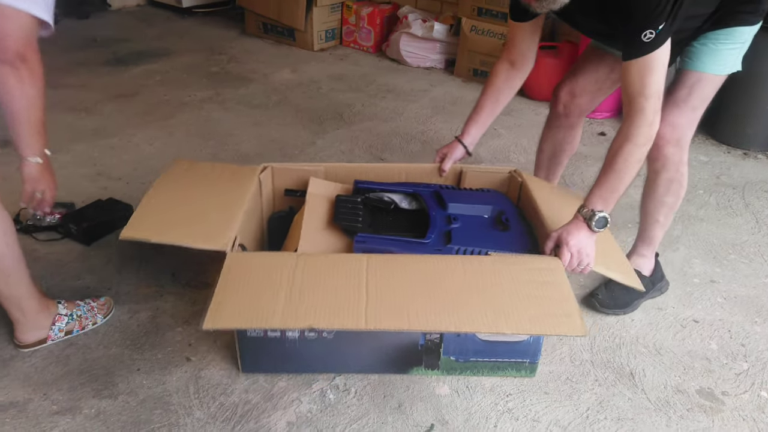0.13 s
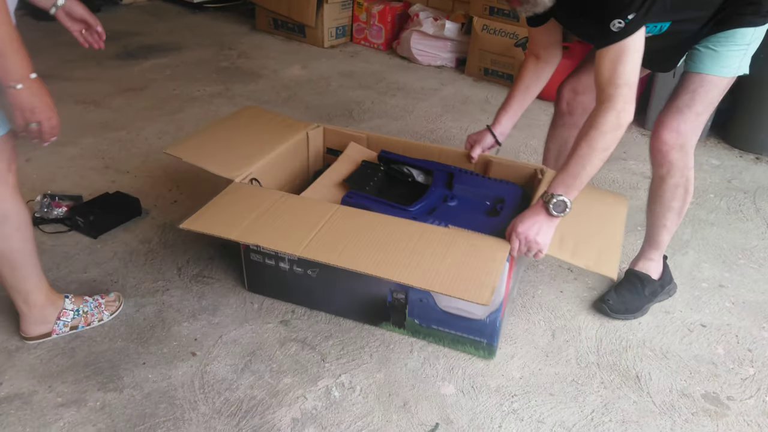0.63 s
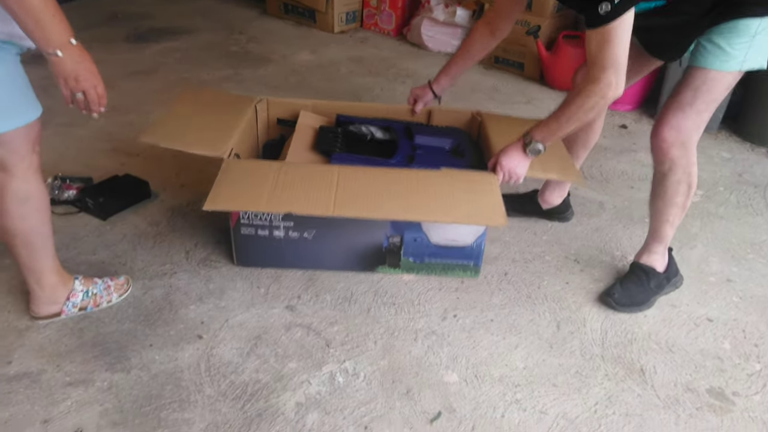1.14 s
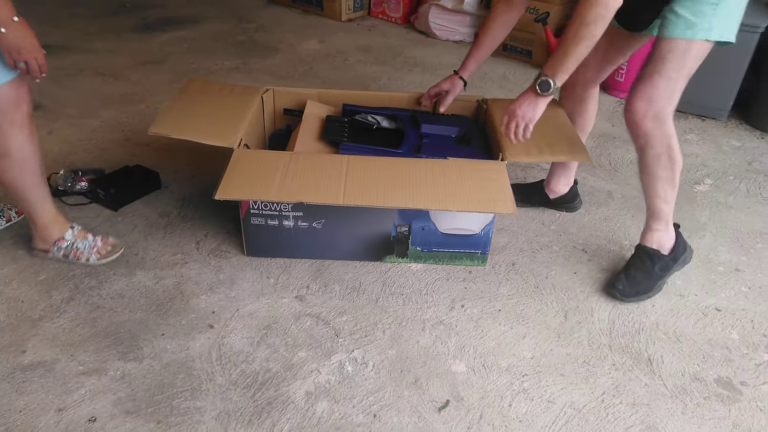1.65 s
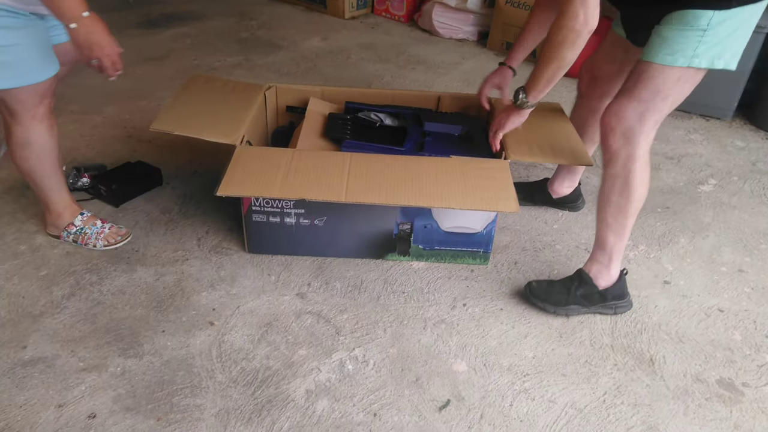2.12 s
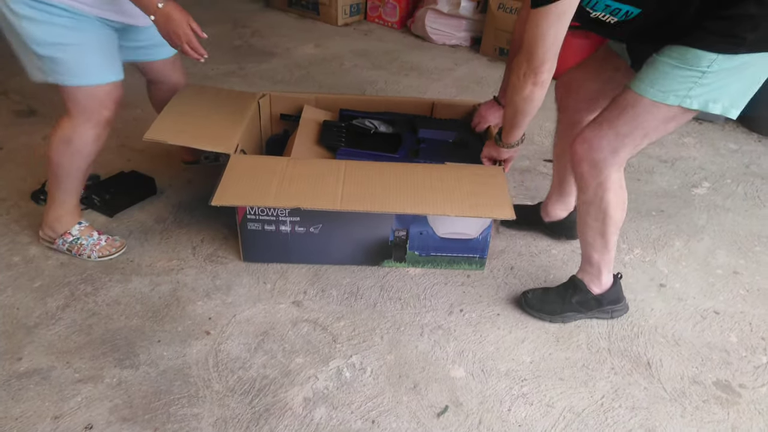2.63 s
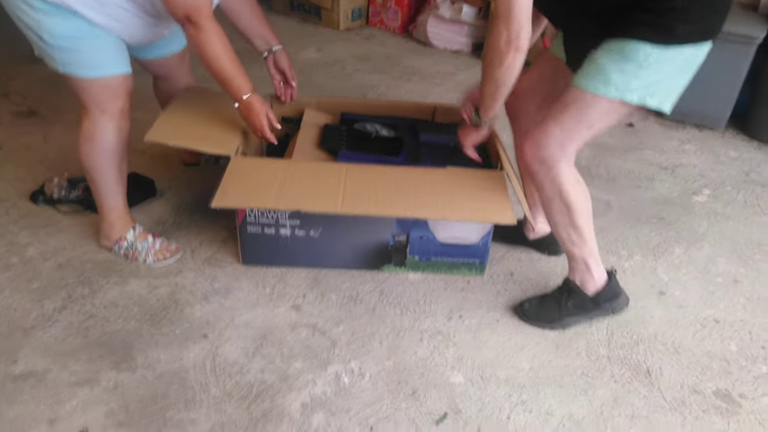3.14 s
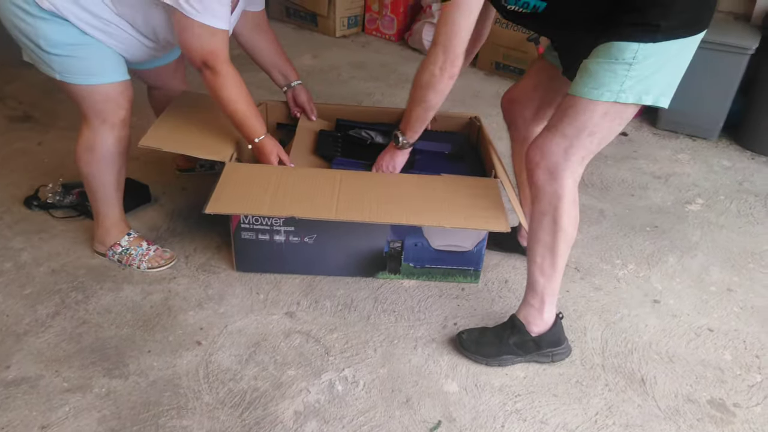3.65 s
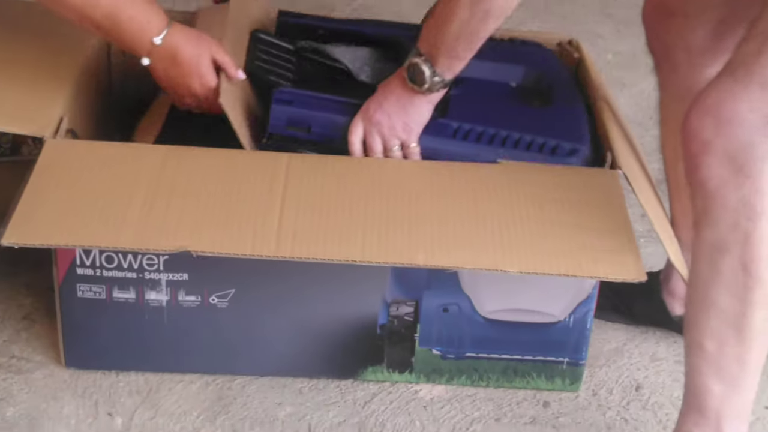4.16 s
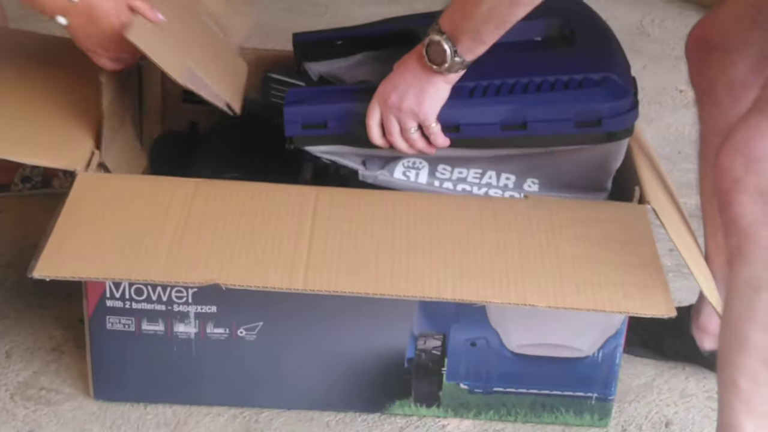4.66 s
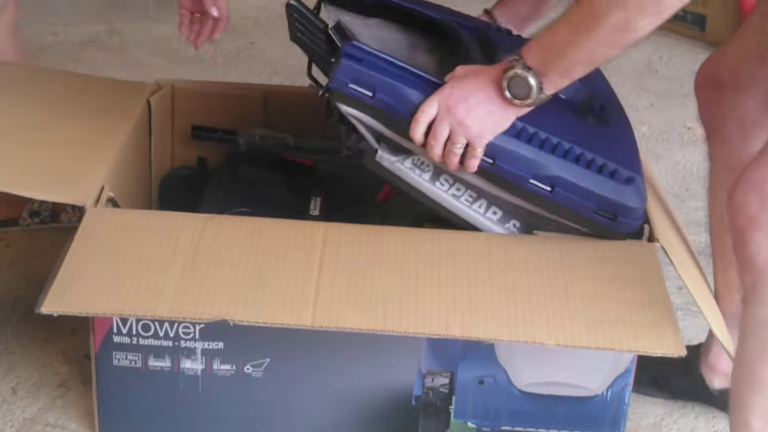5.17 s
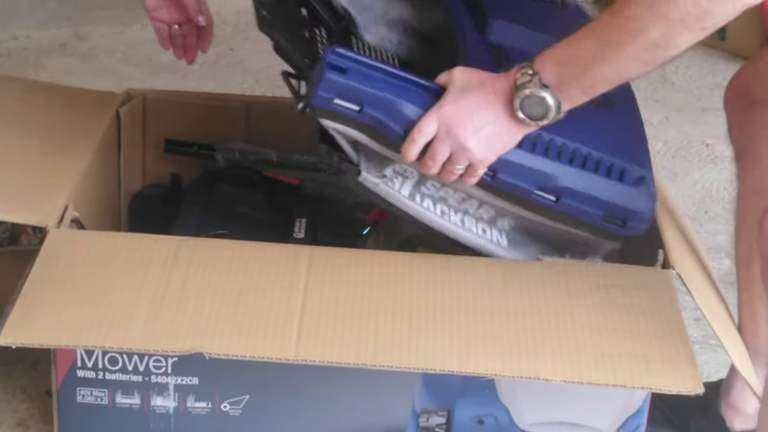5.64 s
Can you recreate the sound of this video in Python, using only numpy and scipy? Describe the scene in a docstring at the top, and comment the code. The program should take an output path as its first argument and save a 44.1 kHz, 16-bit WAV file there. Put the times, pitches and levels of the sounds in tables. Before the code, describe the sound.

A heavy cardboard box is dragged gratingly over concrete in a garage, then plastic parts rustle and knock as they are pulled out.

```python
"""Cardboard box in a garage

A full box is dragged over concrete, then inserts and a plastic part are pulled out of it.
Shaped noise makes the rubbing, struck modes the knocks, noise bursts the snaps and swishes.
Gliding tones make the sparrows, noise strokes a far bird, steady sines a faint motor whine.
Two unlike microphones hear it; a finger covers the left one at first."""
import sys
import numpy as np
from scipy import signal
from scipy.fft import rfft, irfft, next_fast_len
from scipy.io import wavfile
from scipy.ndimage import uniform_filter1d

SR = 44100
rng = np.random.default_rng(int(sys.argv[2]) if len(sys.argv) > 2 else 0)


def gain_from_db(level_db):
    """Convert decibel levels to linear amplitude factors (20 dB per decade)."""
    decades = np.asarray(level_db, float) / 20
    return 10 ** decades


def int16_out(signal):
    """Quantize to a 16-bit WAV file."""
    q = np.round(np.clip(np.atleast_2d(signal).T, -1, 1) * 32767)
    wavfile.write(sys.argv[1], SR, q.astype(np.int16))


N = 255159  # length [samples]

# still air of the garage and the street: (frequency [Hz], level per hertz [dB])
AIR_SPECTRUM = [(25, -115), (38, -88), (52, -70), (65, -77.5), (85, -90), (125, -85), (220, -93.5),
                (800, -100), (3000, -108.5), (7000, -101.5), (12000, -110), (17000, -112)]
# motor whine: (frequency [Hz], level before the lift in air() [dB])
WHINE_TONES = [(732.1, -72), (1464, -71.5), (2196, -75)]
# modes of the box, struck or rubbed: (frequency [Hz], level [dB], free t60 [s])
BOX_MODES = [(63, 1, 0.17), (85.7, 5, 0.2), (134, -1, 0.22), (152.3, 6.5, 0.14), (188, 2, 0.096),
             (250, 3, 0.08), (289.1, 2, 0.082), (347.3, -4, 0.1), (449.3, 2.5, 0.071), (528, 2.5, 0.053),
             (672, -6, 0.14), (965, -12.5, 0.2), (1145, -3.5, 0.028)]
# steady rubbing, first the drag over the floor, then hands shuffling in the box:
# (time [s], force [dB], weight on the walls [dB], brightness [dB])
SHUFFLE_CURVE = [(0, -57.5, -2, -5.5), (.13, -44.5, 3.5, -1.5), (.28, -35, -4, -11), (.33, -32, -1, -3),
                 (.56, -33, 3, -6.5), (.6, -41, 0, -5.5), (.78, -42.5, 12.5, -11), (.98, -29, 9, -5.5),
                 (1.08, -42, 8, -1.5), (1.24, -43.5, 5, -7.5), (1.34, -61.5, 5.5, -4),
                 (2.2, -57.5, -4.5, -9.5), (2.7, -55, -4.5, -11), (2.84, -68.5, 18, 9), (3.1, -56.5, 1, -6),
                 (3.3, -57, -14, -23), (3.55, -53, -4.5, -7.5), (4.3, -51, 2.5, -11.5),
                 (4.64, -54.5, -3, -22), (5.4, -62.5, -6, -19), (5.79, -51, -0.5, -9)]
# slides that swell and fade:
# (time of the peak [s], fade by 20 dB [s], force [dB], weight on the walls [dB], brightness [dB])
SLIDE_EVENTS = [(0.418, 0.0258, -26.5, 0.5, -30), (.53, 0.01, -33, 1, -5), (0.729, 0.036, -44, 19, -18),
                (.76, .03, -35.5, 5, -1.5), (0.903, 0.0314, -22.5, -4, -15), (.98, .07, -25, 8, -6),
                (1.5, 0.27, -61.5, 0.5, -4), (1.6, 0.34, -68, 6, -6), (2.1, 0.14, -57, -9, -6),
                (2.46, 0.07, -52.5, 3, -10), (2.609, 0.06, -53.5, 1.5, -4), (3.29, 0.08, -53.5, -10, -9.5),
                (3.431, 0.0464, -39, -11, -2), (3.62, 0.07, -51, 0.5, -2.5), (4.08, 0.09, -47, -1.5, -7.5),
                (4.19, .09, -42.5, -3.5, -1.5), (4.46, 0.13, -49.5, -0.5, -7),
                (4.533, 0.06, -40, -9.5, -16), (4.8, .08, -47.5, 1, -7), (4.86, 0.06, -38.5, 1.5, -3),
                (4.918, 0.078, -37, 6, -18), (5.33, 0, -56.5, -5, -6.5), (5.501, 0.2, -53.5, -3.5, -14),
                (5.742, 0.06, -27, -2, -16)]
# jerks that start abruptly and die away:
# (time [s], fade by 20 dB [s], force [dB], weight on the walls [dB], brightness [dB])
JERK_EVENTS = [(0.629, 0.29, -37.5, 5, -3.5), (0.814, 0.0881, -19, -13, -8.5), (0.886, 0.02, -20.5, 1, -5),
               (1.358, 2, -70, 3, -9), (1.446, 0.14, -42.5, -20, -18), (3.386, 0.33, -43.5, -9, -8),
               (3.814, 0.08, -35, -7, -9), (4.697, 0.16, -45.5, 0.5, -14), (5.052, 0.1034, -28, 2.5, -27),
               (5.696, 0.2, -33.5, 10.5, -4)]
# plastic fizzes more than card: (time [s], fizz [dB])
FIZZ_CURVE = [(0, 4), (1.2, 10.5), (1.4, 12), (3.3, 9.5), (3.7, 14.5), (5.79, 19.5)]
# snaps and slips of card and plastic: (time [s], level [dB], tone [Hz], ring over burst [dB])
SNAP_EVENTS = [(.0787, -22.5, 2120, -9), (.2154, -22.5, 2640, 10.5), (.3037, -21, 1540, -20),
               (.3444, -20, 1030, 9.5), (.4144, -30, 1570, 2), (.4609, -26, 2370, 17),
               (.4743, -15.5, 2680, 13.5), (.5312, -19.5, 2220, 11), (.6275, -16.5, 2400, 12.5),
               (.6474, -26.5, 1540, 13), (.6853, -14.5, 1930, 7.5), (.7512, -25, 1340, 6),
               (.8106, -10.5, 1410, -15), (.8869, -8, 1170, -9), (.9263, -12.5, 1190, 14),
               (.9652, -8, 1320, 5), (.9904, -8, 1020, -3), (1.0216, -9.5, 1310, 3),
               (1.3568, -31.5, 2900, -18), (1.4456, -28.5, 1460, -18), (3.2655, -42, 1270, 8),
               (3.3827, -45, 956, -1), (3.3997, -38, 3800, 26), (3.4116, -32.5, 2130, 14),
               (3.4305, -31.5, 2630, 22.5), (3.4436, -22.5, 969, -31), (3.4564, -28.5, 2360, 19),
               (3.4615, -40, 2480, 19), (3.6162, -41, 996, 3), (3.8142, -22, 1610, -4),
               (4.5286, -23, 840, 3), (4.6967, -31, 900, 9), (4.781, -33.5, 2300, 23),
               (5.0564, -18.5, 1010, 5), (5.0978, -28.5, 1100, 14), (5.2111, -36, 2900, 9),
               (5.4276, -45, 2600, 22), (5.668, -35, 1360, -6), (5.693, -13, 2700, -5)]
# knocks and steps:
# (time [s], peak [dB], tone that the struck spot favours [Hz], ring an octave above it [dB])
KNOCK_EVENTS = [(.17, -63, 250, -6), (.337, -54, 127, -4), (.626, -32, 270, -4), (.813, -24.5, 342, -25),
                (.89, -19, 225, -3), (1.348, -43, 146, 2), (1.446, -37.5, 288, -7),
                (1.631, -39.5, 264, -19), (2.222, -52, 128, -11), (2.341, -40.5, 280, -12.5),
                (2.442, -38, 188, -9), (2.587, -41, 134, -2), (2.601, -38.5, 148, 8), (2.758, -53, 127, -2),
                (2.834, -29, 164, -4.5), (2.995, -44, 175, -10), (3.048, -32.5, 144, -2),
                (3.4, -46, 230, -14), (3.527, -43, 127, -5), (3.611, -42.5, 148, -12),
                (3.815, -36.5, 152, -13), (4.017, -42, 195, -14), (4.168, -37.5, 181, 5),
                (4.523, -47, 264, -4), (4.701, -38.5, 347, -6), (4.715, -44, 150, -12),
                (4.909, -32, 444, 8), (5.048, -21.5, 160, 1), (5.098, -28.5, 201, -9.5),
                (5.126, -41, 109, -6), (5.485, -38, 80.5, -4), (5.7, -24.5, 380, -6),
                (5.733, -18, 326, -10)]
# card squeaks on concrete or plastic: (time [s], level [dB], tone [Hz], length [s])
SQUEAK_EVENTS = [(0.3, -28, 3540, .03), (.316, -25.5, 4020, 0.024), (0.741, -30, 4030, 0.018),
                 (3.267, -54, 2760, 0.03), (3.379, -45, 980, 0.028), (3.505, -56, 2450, .02)]
# one sparrow chirp, a faint lead-in first: (time [s], pitch [Hz], level within the chirp [dB])
CHIRP_GLIDE = [(0, 5553, -33), (.008, 5970, -7), (.013, 5860, -21), (.013, 3883, -5.5), (.019, 4160, 2),
               (.033, 5550, 0.5), (.045, 5932, -2.5), (.054, 4307, 4.5), (.061, 3617, 7.5),
               (0.069, 4059, -5.5), (.079, 3322, 4.5), (.092, 3468, 2.5), (.103, 4100, 3.5),
               (.108, 4500, -6)]
# sparrow chirps: (time [s], level before the mix [dB])
SPARROW_CALLS = [(0.47, -33), (1.9, -36), (2.758, -35), (4.077, -38.5), (5.458, -39)]
# swishes of plastic and cloth, all treble; a fade under 0.005 s counts as 0.005 s:
# (time of the peak [s], fade by 20 dB [s], level [dB], top octave over level [dB])
SWISH_EVENTS = [(1.37, 0.13, -42, -8), (1.56, 0.1, -40, -8), (1.81, -0.37, -35, -10),
                (2.12, -0.04, -42.5, -13), (2.232, 0.03, -40, -6), (2.53, 0.5, -46, -1),
                (2.72, -0.1, -47, 1), (2.81, 0.25, -48, 0), (2.97, 0.07, -38.5, -3), (3.77, 0.2, -46, 2),
                (3.85, 0.33, -40, 0), (4.19, 0.1254, -24, 1.5), (4.03, -0.26, -46, 4), (4.54, .03, -38, 6),
                (4.76, 0.02, -39, 5), (4.9, 0.16, -28, 6), (5.23, .03, -31, 6), (5.265, 0.04, -32, 6),
                (5.675, -0.3, -41.5, 6)]
# a far bird's short trills: (time [s], level [dB], middle pitch [Hz])
FAR_TRILLS = [(1.6297, -55, 5100), (2.1844, -50, 5000), (2.3896, -47, 5100), (2.4468, -51, 5300),
              (3.0926, -49, 5020), (4.371, -50, 5300), (4.674, -53.5, 5380), (5.29, -44.5, 4400)]
# reverberation of the garage: (frequency [Hz], t60 [s])
GARAGE_DECAY = [(100, 0.42), (500, 0.4), (2000, 0.43), (6000, 0.28), (14000, 0.43)]
# likeness of the two sides: (frequency [Hz], share of power in common [0-1])
LIKENESS = [(60, 1), (130, 0.98), (290, 0.94), (640, 0.51), (1410, 0.047), (3100, 0.0072), (6820, 0.016),
            (15000, 0.02)]
# left microphone colour: (frequency [Hz], gain [dB])
LEFT_COLOUR = [(20, -4), (45, 2.5), (3000, 0), (4100, -3), (4600, -0.5), (5500, 2.5), (7100, 6), (7600, 1),
               (8100, -9.5), (8700, -2.5), (11000, -12), (11600, -14.5), (12500, -13), (14500, -10),
               (15900, -11), (16400, -42)]
# right microphone colour: (frequency [Hz], gain [dB])
RIGHT_COLOUR = [(20, -15), (45, 0), (3000, -3), (4000, 3), (5300, 12.5), (6500, 4), (7400, -12),
                (7950, -30), (8400, -21.5), (9000, -25.5), (9500, -32), (10300, -27), (13000, -30),
                (13600, -26), (14300, -18.5), (15900, -16), (16400, -33)]
# finger sliding off the left port: (time [s], upper edge of what passes [Hz])
FINGER_EDGE = [(0, 196), (.2, 250), (.27, 686), (0.302, 1870), (.35, 5350), (.4, 15300), (.46, 40000)]
# the finger pops off the port: (level [dB], first pitch [Hz], last pitch [Hz], t60 [s])
FINGER_BUMP = (-15, 77, 48, 0.15)
# a nail ticks the case by the left port: (time [s], level [dB])
NAIL_TICKS = [(2.228, -29), (2.7655, -23)]

BOOM_DB, SCRAPE_DB, GRIT_DB = -2, 4, 12.5  # how loud each layer answers the rubbing
FIZZ_FOLLOWS = 0.71  # dB of fizz per dB of brightness
RASP_HZ, RASP_OCTAVES_PER_DB = 2230, -0.7  # brighter rubbing rasps lower
JERK_RISE_S = .006  # time to rise 20 dB
PUFF_T60_S, SOFTNESS = 0.043, .42  # decay of a snap's puff; share of puff against crack [0-1]
SWISH_LOW_DB = -8.5  # lower band of a swish against its middle band
BUMP_S = .269  # when the finger pops off


def evened(x):
    """Scales to rms 1."""
    return x / np.sqrt(np.mean(x ** 2) + 1e-20)


def read(points, hz):
    """Reads a spectrum on a log-frequency axis."""
    f, value = np.transpose(points)
    return np.interp(np.log(hz + 1), np.log(f + 1), value)


def add(mix, s, sound):
    """Mixes a sound in at time s."""
    part = mix[..., round(s * SR):][..., :sound.shape[-1]]
    part += sound[..., :part.shape[-1]]


def band(x, lo_hz, hi_hz):
    """Band-pass."""
    sos = signal.butter(2, [lo_hz, min(hi_hz, .49 * SR)], "band", fs=SR, output="sos")
    return signal.sosfilt(sos, x)


def resonate(x, hz, width):
    """Shifts the curve hz down to zero, smooths, and shifts back: a moving resonance of gain 1."""
    turn = np.exp(2j * np.pi * np.cumsum(hz * np.ones(x.shape[-1])) / SR)
    r = np.exp(-np.pi * width / SR)
    return 2 * (turn * signal.lfilter([1 - r], [1, -r], x / turn)).real


def pair(x):
    """Spaced microphones: two unrelated signals made alike in the bass."""
    size = next_fast_len(x.shape[1])
    same = np.sqrt(np.clip(read(LIKENESS, np.fft.rfftfreq(size, 1 / SR)), 0, 1))
    a, b = rfft(x, size)
    return irfft([a, same * a + np.sqrt(1 - same ** 2) * b], size)[:, :x.shape[1]]


def swell(t, peak, fade):
    """A rounded rise and fall in dB, 20 dB down at fade seconds from the peak."""
    return -20 * ((t - peak) / max(fade, .005)) ** 2


def air():
    """Steady room and street noise with a thin, barely wavering motor whine."""
    hz = np.fft.rfftfreq(N, 1 / SR)
    density = gain_from_db(read(AIR_SPECTRUM, hz)) * np.sqrt(SR / 2)
    hush = irfft(rfft(rng.standard_normal((2, N))) * density, N)
    waver = 1 + 0.0005 * evened(uniform_filter1d(rng.standard_normal(N), 4000))
    seconds = np.cumsum(waver) / SR
    whine = sum(gain_from_db(db + 3.5) * np.sin(2 * np.pi * f * seconds) for f, db in WHINE_TONES)
    return pair(hush) + whine


def pressing(weight=0., bright=0.):
    """Friction gain over time for a layer that follows weight and brightness by these amounts."""
    t = np.arange(0, N + 32, 32) / SR
    s, force_db, weight_db, bright_db = np.transpose(SHUFFLE_CURVE)
    total = gain_from_db(np.interp(t, s, force_db + weight * weight_db + bright * bright_db))
    shapes = [swell(t, s, fade) for s, fade, *_ in SLIDE_EVENTS]
    for s, fade, *_ in JERK_EVENTS:
        shapes.append(-20 * np.maximum((t - s) / max(fade, .005), (s - t) / JERK_RISE_S))
    for shape_db, event in zip(shapes, [*SLIDE_EVENTS, *JERK_EVENTS]):
        force_db, weight_db, bright_db = event[2:]
        gain = gain_from_db(force_db + weight * weight_db + bright * bright_db + shape_db)
        total = np.hypot(total, gain)
    return np.interp(np.arange(N) / SR, t, total)


def scattered(per_s, spread_db):
    """Random impulses of uneven size."""
    sizes = gain_from_db(spread_db * np.minimum(rng.exponential(1, N), 4))
    return sizes * (rng.random(N) < per_s / SR)


def grit(per_s, spread_db, grain_s, bed):
    """Stick-slip friction: noise broken into short grains of uneven size over a steady bed."""
    sizes = scattered(per_s, spread_db)
    grains = signal.lfilter([1], [1, -np.exp(-1 / (grain_s * SR))], sizes)
    return pair(evened((bed + evened(grains)) * rng.standard_normal((2, N))))


def chips(per_s, spread_db):
    """Flutes of the card catch and let go: tiny rings at twenty tones, leaning left or right in turn."""
    sizes = scattered(per_s, spread_db)
    kind, t, out = rng.integers(0, 20, N), np.arange(600) / SR, np.zeros((2, N))
    for k, hz in enumerate(np.geomspace(700, 4500, 20)):
        ring = np.sin(2 * np.pi * hz * t) * np.exp(-t * hz / 18.0)
        out[k % 2] += signal.oaconvolve(sizes * (kind == k), ring)[:N]
    return evened(out + 0.097 * out[::-1])


def rubbed_walls(friction):
    """Friction drives the box modes; hands and floor damp them wider, and the middle ones speak most."""
    walls = 0
    for hz, db, t60 in BOX_MODES:
        b, a = signal.iirpeak(hz, hz * t60 / 7.5, SR)
        walls = walls + gain_from_db(db - 2.3 * abs(np.log2(hz / 330))) * signal.lfilter(b, a, friction)
    return evened(walls)


def rubbing():
    """One friction heard four ways: through the box walls, as card scrape with a rasp, as grit and as fizz."""
    force, heavy = pressing(), pressing(weight=1)
    bright, fizzing = pressing(bright=1), pressing(bright=FIZZ_FOLLOWS)
    coarse = grit(per_s=120, spread_db=6.0, grain_s=0.0066, bed=1.8)
    fine = grit(per_s=300, spread_db=3, grain_s=.002, bed=1.7)

    brightness_db = 20 * np.log10(bright / force)
    rasp_hz = np.clip(RASP_HZ * 2 ** (RASP_OCTAVES_PER_DB * brightness_db), 900, 3200)
    scrape = band(coarse, 460, 3140) + gain_from_db(-17) * resonate(coarse, rasp_hz, 150)
    scrape += gain_from_db(-18.0) * chips(per_s=250, spread_db=2.0)

    fizz_gain = gain_from_db(np.interp(np.arange(N) / SR, *np.transpose(FIZZ_CURVE)))
    out = gain_from_db(BOOM_DB) * heavy * rubbed_walls(coarse)
    out = out + gain_from_db(SCRAPE_DB) * force * scrape
    out += gain_from_db(GRIT_DB) * bright * band(fine, 2810, 9400)
    return out + fizzing * fizz_gain * band(fine, 7490, 14250)


def snaps():
    """A sharp crack and a short puff of noise; the piece that slips rings briefly at its tone."""
    out, t = np.zeros((2, N)), np.arange(8192) / SR
    puff = gain_from_db(-60 * t / PUFF_T60_S) * (1 - np.exp(-t / 0.0015))
    noises = rng.standard_normal((len(SNAP_EVENTS), 2, 8192))
    for (s, level_db, tone_hz, ring_db), noise in zip(SNAP_EVENTS, noises):
        crack = 1.6 * np.sign(noise) * np.exp(-t / .0007)
        burst = pair((1 - SOFTNESS) * crack + SOFTNESS * puff * noise)
        ring = gain_from_db(ring_db) * resonate(resonate(burst, tone_hz, 1140), tone_hz, 1140)
        add(out, s - .0005, gain_from_db(level_db) * (band(burst, 360, 15000) + ring))
    return out


def knocks():
    """Each blow rings the box modes near the tone of the struck spot and its octave, after a soft push."""
    out, t = np.zeros(N), np.arange(SR // 2) / SR
    hz, db, t60 = np.transpose(BOX_MODES)[:, :, None]
    phases = 0.28 * rng.random((len(KNOCK_EVENTS), len(BOX_MODES), 1))  # in turns
    for (s, peak_db, spot_hz, octave_db), phase in zip(KNOCK_EVENTS, phases):
        octaves = np.log2(hz / spot_hz)
        near_db = np.maximum(-24 * abs(octaves), octave_db - 24 * abs(octaves - 1))
        modes = gain_from_db(db + near_db - 60 * t / t60) * np.sin(2 * np.pi * (hz * t + phase))
        ring = modes.sum(0) * (1 - np.exp(-t / 0.0042))
        add(out, s - .004, gain_from_db(peak_db) * ring / abs(ring).max())
    return out


def squeaks():
    """Narrow resonances of noise: short wavering tones with a soft start and end."""
    out = np.zeros(N)
    noises = rng.standard_normal((len(SQUEAK_EVENTS), 4000))
    for (s, db, hz, length), noise in zip(SQUEAK_EVENTS, noises):
        tone = evened(resonate(resonate(noise, hz, 230), hz, 230))[-round(length * SR):]
        add(out, s, gain_from_db(db) * tone * np.hanning(len(tone)))
    return out


def sparrows():
    """A hoarse whistle that leaps up, drops, wobbles and curls up again."""
    out = np.zeros(N)
    s, hz, db = np.transpose(CHIRP_GLIDE)
    t = np.arange(0, s[-1], 1 / SR)
    glide = uniform_filter1d(np.interp(t, s, hz), 60)
    whistle = np.sin(2 * np.pi * np.cumsum(glide) / SR) * signal.windows.tukey(len(t), .05)
    for start, call_db in SPARROW_CALLS:
        flutter = 1 + 0.29 * evened(resonate(rng.standard_normal(len(t)), 167, 46))
        add(out, start, gain_from_db(call_db + np.interp(t, s, db)) * flutter * whistle)
    return out + gain_from_db(-14.5) * np.roll(out, round(0.037 * SR))  # a wall across the yard answers


def swishes():
    """Fine friction with no body: brief rounded bursts of treble."""
    t = np.arange(N) / SR
    film = grit(per_s=600, spread_db=2, grain_s=.002, bed=2.)
    level = sum(gain_from_db(db + swell(t, s, fade)) for s, fade, db, _ in SWISH_EVENTS)
    top = sum(gain_from_db(db + top_db + swell(t, s, fade)) for s, fade, db, top_db in SWISH_EVENTS)
    body = band(film, 7140, 11900) + gain_from_db(SWISH_LOW_DB) * band(film, 3300, 8300)
    return level * body + top * band(film, 10600, 15000)


def far_bird():
    """Three quick, blurred strokes of a high whistle, each falling in pitch, the first the strongest."""
    out, t = np.zeros(N), np.arange(0, .036, 1 / SR)
    angle = np.pi * 83 * t  # 83 strokes a second
    stroke = np.sin(angle) ** 2
    for s, level_db, hz in FAR_TRILLS:
        blur = resonate(rng.standard_normal(len(t)), hz + 350 * np.cos(angle % np.pi), 450)
        add(out, s - .003, gain_from_db(level_db - 280 * t) * (0.13 + stroke) * evened(blur))
    return out


def garage(x):
    """Sparse taps of random sign, one in every 20 samples, each band dying at its own speed."""
    taps = np.zeros((2, SR))
    at = np.arange(200, SR - 20, 20) + rng.integers(0, 20, (2, (SR - 201) // 20))
    np.put_along_axis(taps, at, rng.choice([-1., 1.], at.shape), 1)
    hz, t, z = signal.stft(pair(taps), SR, nperseg=256)
    decay = gain_from_db(-60 * t / read(GARAGE_DECAY, hz)[:, None])
    tail = signal.istft(z * decay, SR, nperseg=256)[1]
    return signal.fftconvolve(np.atleast_2d(x), tail / np.linalg.norm(tail[0]), axes=1)[:, :N]


def scene():
    """Close sources with some room; the birds reach in both directly and by way of the walls."""
    rub, hits = rubbing() + swishes(), knocks() + snaps()
    birds, far = sparrows(), far_bird()
    walls = gain_from_db(-7.0) * rub + gain_from_db(-1.0) * hits + gain_from_db(-2.5) * birds + gain_from_db(-5.0) * far
    direct_birds = gain_from_db([[-4], [-1]]) * birds + far  # sparrows lean right
    return rub + hits + squeaks() + direct_birds + garage(walls) + air()


def covered(x):
    """The finger is a low-pass that opens as it slides off; the hand nearby shades the port by 3 dB."""
    hz, t, z = signal.stft(x, SR, nperseg=512)
    s, edge_hz = np.transpose(FINGER_EDGE)
    edge_hz = np.exp(np.interp(t, s, np.log(edge_hz)))
    gain = gain_from_db(-3) / np.sqrt(1 + (hz[:, None] / edge_hz) ** 6)
    return signal.istft(z * gain, SR, nperseg=512)[1][:N]


def finger_bump():
    """The finger pops off: a soft-edged thump whose pitch sags as it dies."""
    t = np.arange(SR // 4) / SR
    db, first_hz, last_hz, t60 = FINGER_BUMP
    turns = np.cumsum(last_hz + (first_hz - last_hz) * np.exp(-t / 0.014)) / SR
    return -gain_from_db(db - 60 * t / t60) * np.sin(2 * np.pi * turns) * (1 - np.exp(-t / 0.0023))


def nail_tick():
    """A nail on the case: a spike, then its recoil."""
    t = np.arange(SR // 4) / SR
    return np.exp(-t / 0.00018) - 0.27 * t / 0.00087 * np.exp(1 - t / 0.00076)


def colour(points):
    """Causal filter from a spectrum: minimum phase by the folded cepstrum."""
    cep = irfft(np.log(gain_from_db(read(points, np.fft.rfftfreq(4096, 1 / SR)))))
    cep[1:2048] *= 2
    cep[2049:] = 0
    return irfft(np.exp(rfft(cep)))[:2048]


def band_limit(x):
    """A steep low-pass at the top of the band."""
    return signal.sosfilt(signal.butter(12, 16830, fs=SR, output="sos"), x)


def record(dry):
    """A finger muffles, bumps and ticks the left port; each microphone has its colour and hiss."""
    left = covered(dry[0])
    add(left, BUMP_S, finger_bump())
    for s, db in NAIL_TICKS:
        add(left, s, gain_from_db(db) * nail_tick())
    sides = ((left, LEFT_COLOUR), (dry[1], RIGHT_COLOUR))
    mix = np.array([signal.fftconvolve(side, colour(mic))[:N] for side, mic in sides])
    mix += gain_from_db(-78) * band(rng.standard_normal(mix.shape), 300, 13000)  # hiss
    return band_limit(mix)


dry = scene()
out = record(dry)
int16_out(out)
```